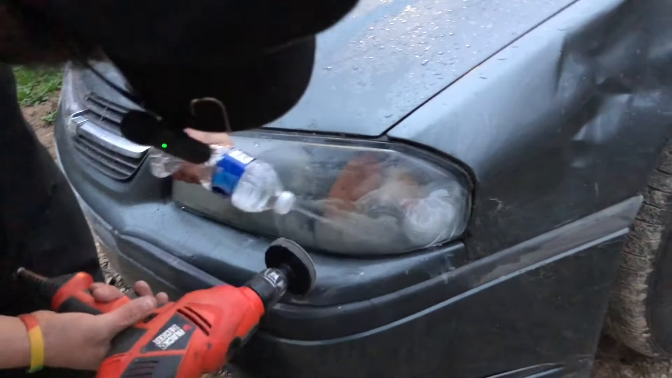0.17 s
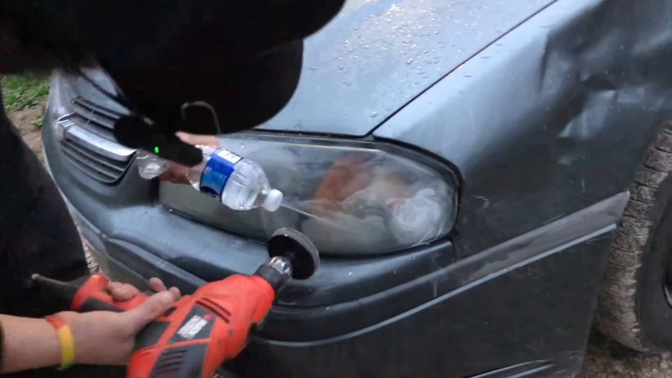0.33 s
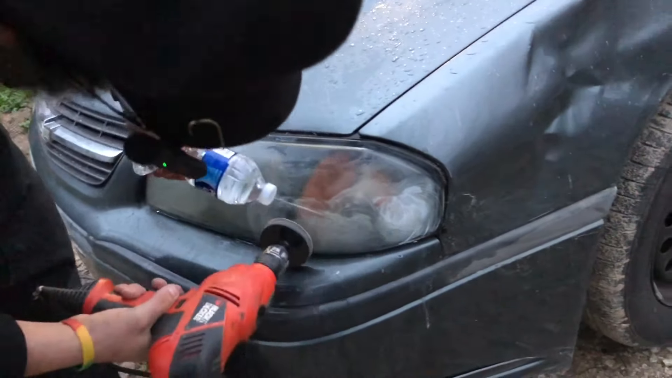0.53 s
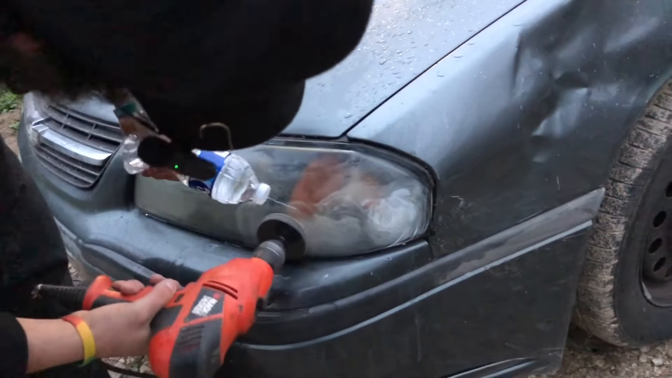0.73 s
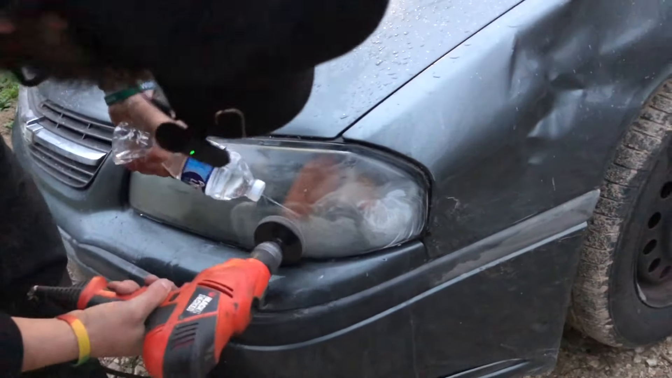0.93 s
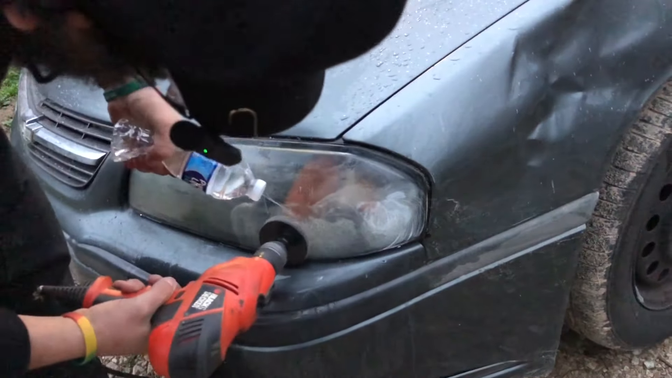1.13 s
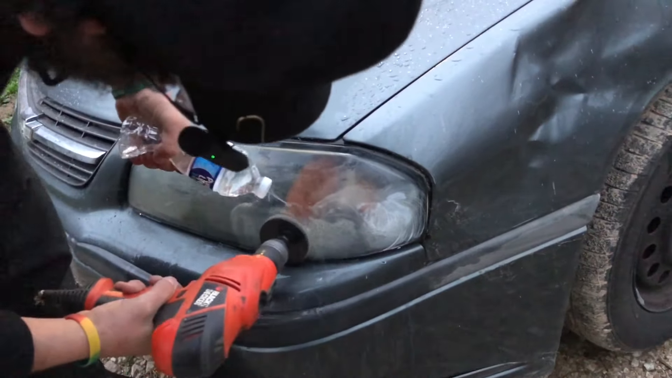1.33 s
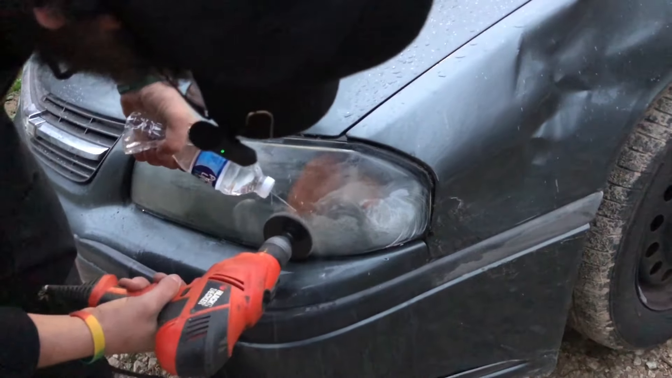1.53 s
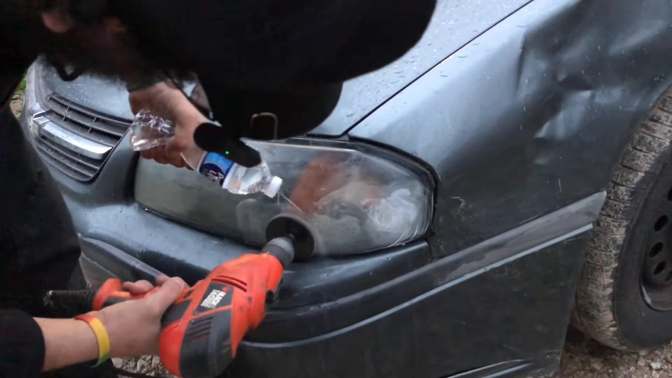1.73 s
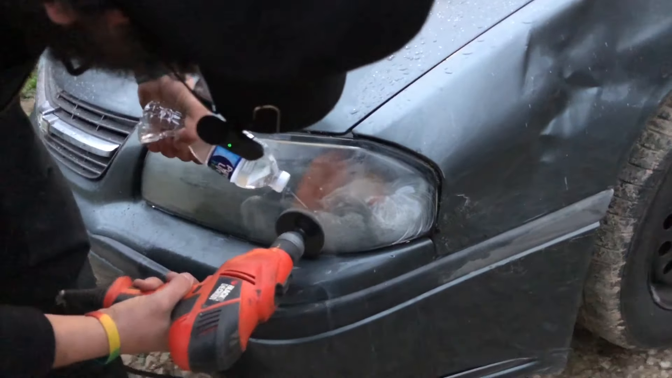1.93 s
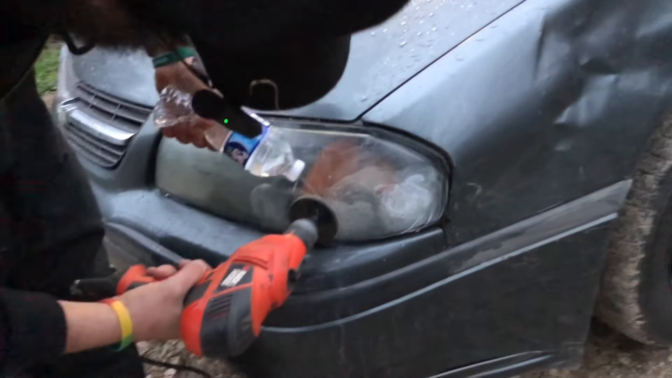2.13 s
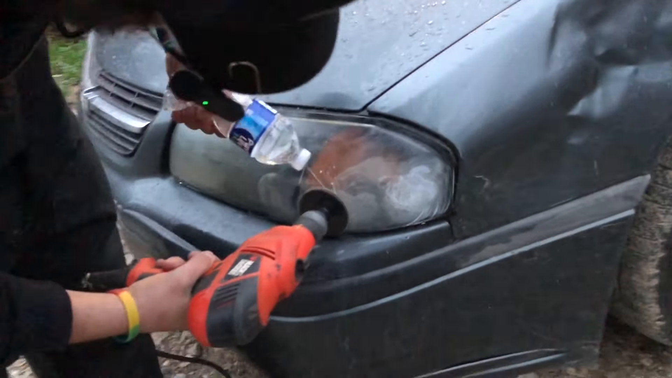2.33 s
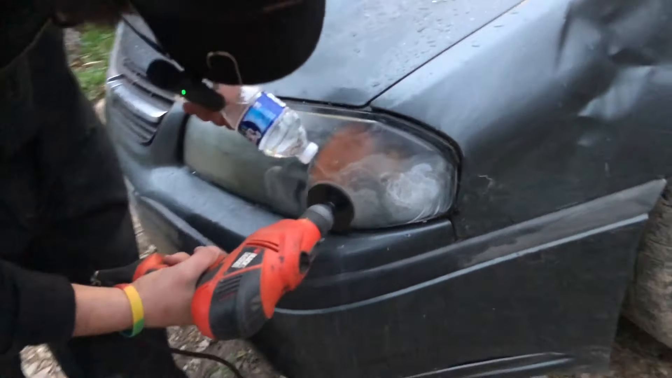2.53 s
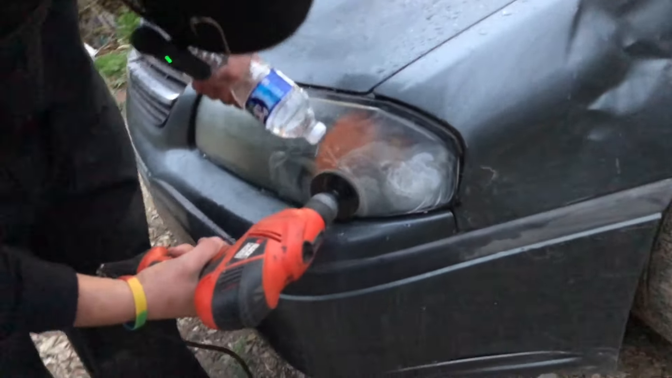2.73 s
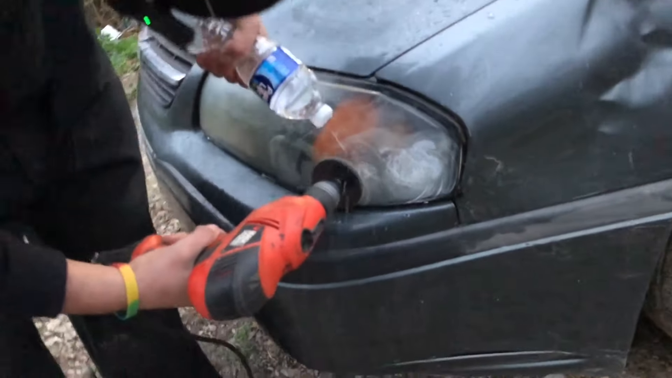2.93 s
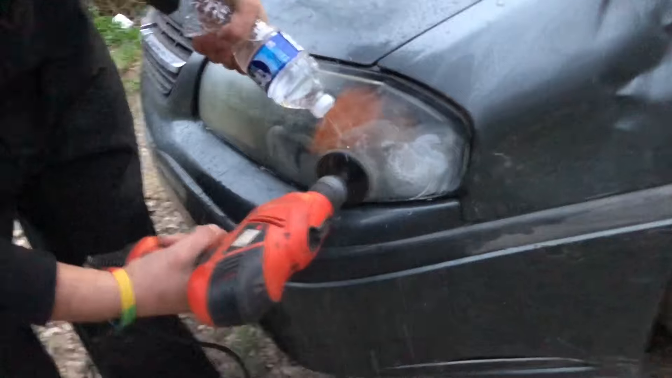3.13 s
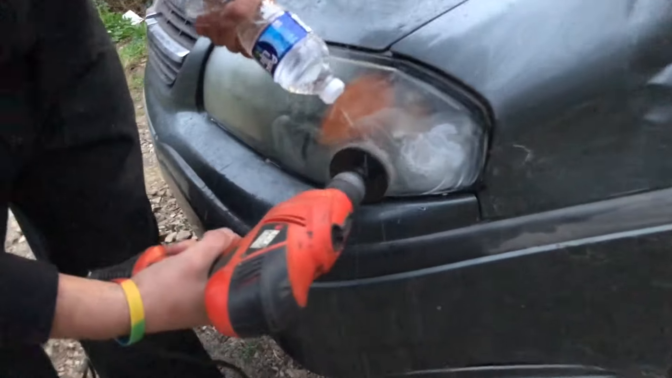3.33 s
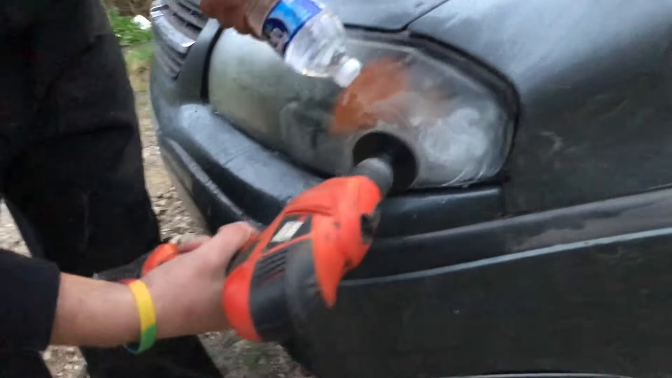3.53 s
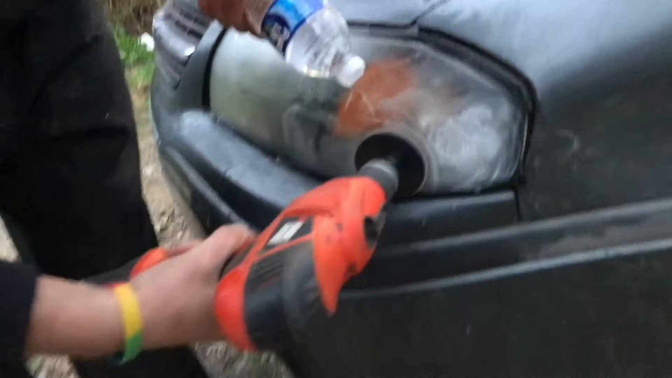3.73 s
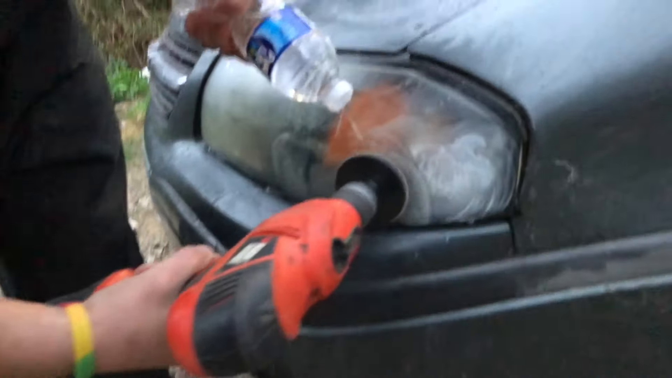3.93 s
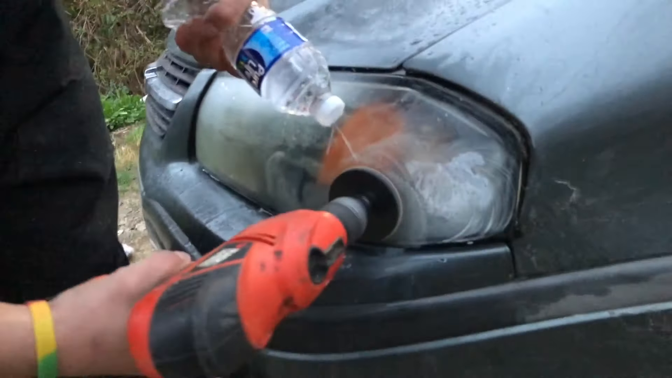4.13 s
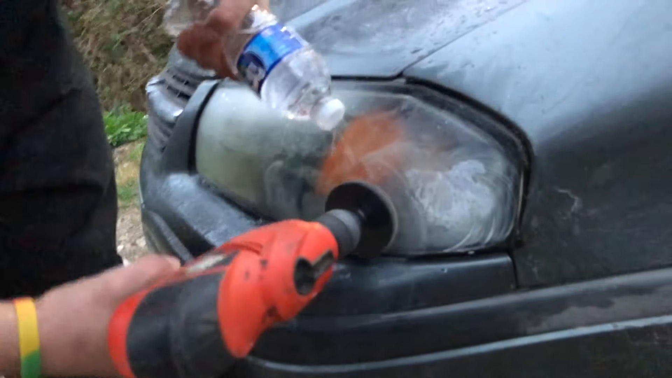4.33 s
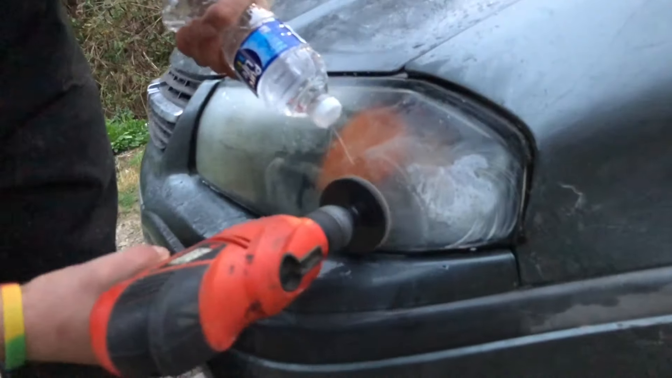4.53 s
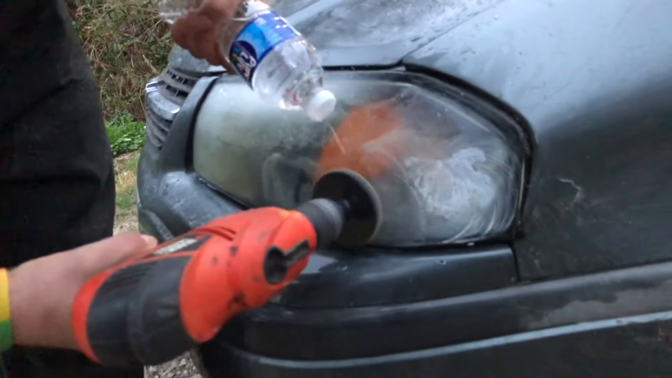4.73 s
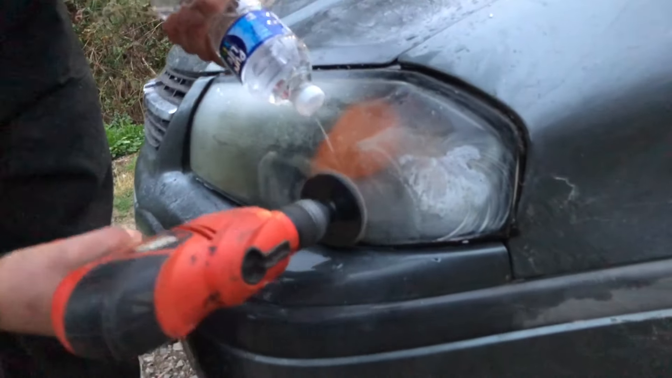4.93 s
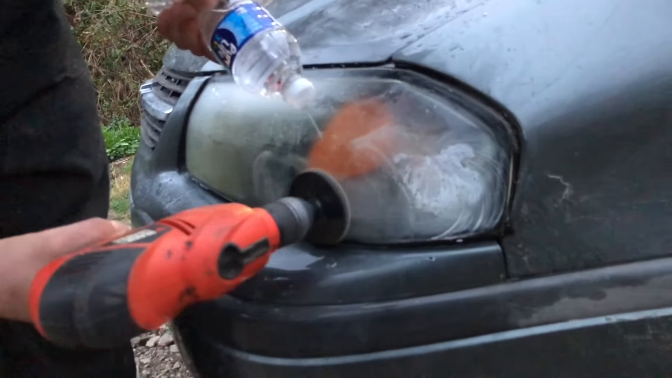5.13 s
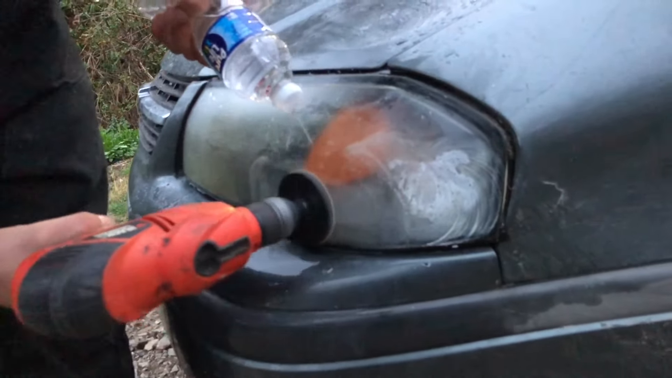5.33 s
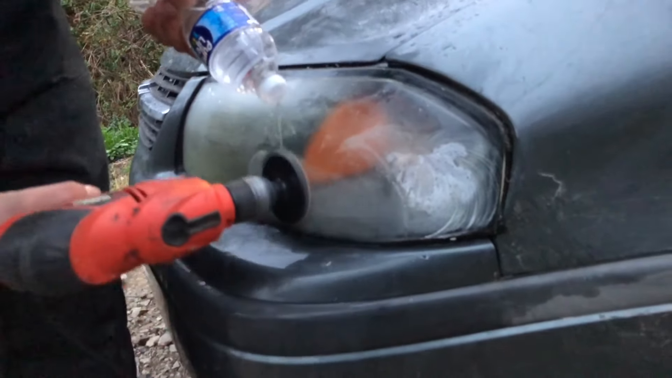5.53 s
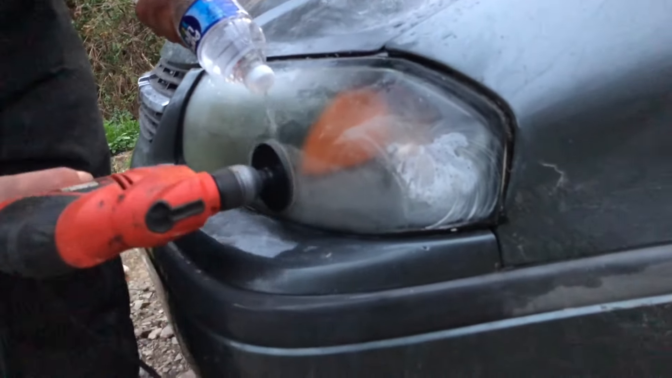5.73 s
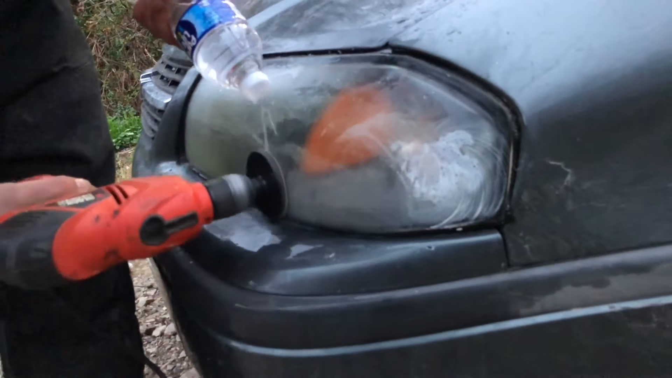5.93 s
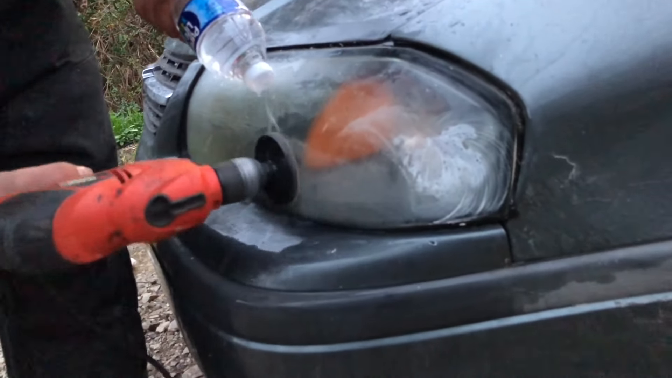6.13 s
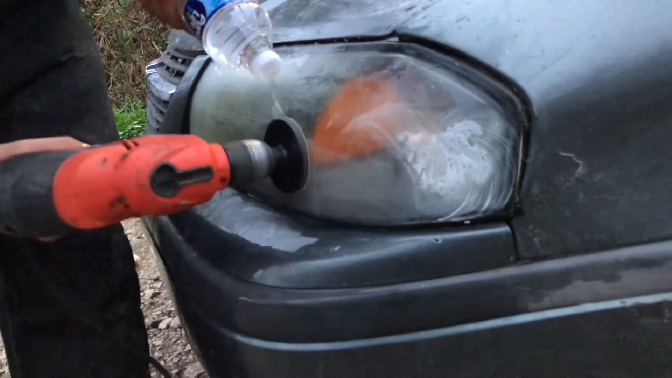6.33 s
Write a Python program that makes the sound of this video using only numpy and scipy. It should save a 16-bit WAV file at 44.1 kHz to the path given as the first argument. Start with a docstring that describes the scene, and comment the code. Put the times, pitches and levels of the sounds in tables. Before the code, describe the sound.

Close, dry outdoor sound of an electric drill sanding a plastic car lamp. It begins with a tiny rasp and near silence, then the motor catches in buzzing pulses and climbs quickly to full speed, with dull handling thumps beneath. Harsh gear rasp and resonant plastic rubbing fill the middle, growing quieter and less airy as the microphone turns aside. After a momentary gap, the rubbing is lighter and hissier.

```python
"""First a brief dry rasp dies away over a faint outdoor hush, then dull low thumps: noise and 125 Hz tones.
A mains drill stutters at half trigger and whines up to full speed: shaped noise and tones follow its motor.
Its wet sanding disc grinds on a plastic headlight, close by: ringing noise gives the lens and its squeals.
The microphone turns away from the work and the grinding grows quieter. Near the end it dips briefly and
comes back thinner and brighter: a lighter hiss with its own tones."""
import sys
import numpy as np
from scipy import signal
from scipy.fft import rfft, irfft, next_fast_len
from scipy.io import wavfile
from scipy.ndimage import uniform_filter1d, map_coordinates

SR = 44100
rng = np.random.default_rng(int(sys.argv[2]) if len(sys.argv) > 2 else 0)


def to_wav(s):
    """Save 16-bit WAV."""
    ch = np.atleast_2d(s).T  # columns
    pcm = np.round(np.clip(ch, -1, 1) * 32767)  # PCM
    wavfile.write(sys.argv[1], SR, pcm.astype(np.int16))


N = 280917
T = np.arange(N) / SR  # time of every sample, in seconds
TOP_HZ = 15700  # top of the sound's band; anything higher is cut


def amp(db):
    """Turn decibels into a gain."""
    return 10 ** (np.asarray(db) / 20)


def unit(x):
    """Scale a sound to an average (rms) level of 1."""
    return x / np.sqrt(np.mean(x ** 2) + 1e-20)


def curve(rows):
    """Join (time in s, value) points by straight lines, one value per sample."""
    return np.interp(T, *np.transpose(rows))


def ramp(start_s, length_s):
    """Rise in a straight line from 0 to 1."""
    return np.clip((T - start_s) / length_s, 0, 1)


def swell(peak_s, length_s):
    """Rise and fall smoothly, reaching 1 at peak_s."""
    return np.exp(-2 * ((T - peak_s) / length_s) ** 2)


def wobble(rate):
    """Draw a smooth random curve through this many random points a second."""
    points = rng.standard_normal(int(N * rate / SR) + 4)
    return map_coordinates(points, [T * rate])


def filtered(x, response):
    """Multiply each frequency of a sound by the gain that response(hz) gives."""
    size = next_fast_len(N + 8192)
    hz = np.fft.rfftfreq(size, 1 / SR)
    return irfft(rfft(x, size) * response(hz), size)[..., :N]


def colour(x, spectrum, peaks=()):
    """Shape a sound by a smooth spectrum with peaks and hollows on it, at rms 1."""
    point_hz, point_db = np.transpose(spectrum)

    def response(hz):
        smooth_db = np.interp(np.log(hz + 1), np.log(point_hz + 1), point_db)
        bumps_db = sum(db * np.exp(-2 * ((hz - centre) / width) ** 2) for centre, width, db in peaks)
        return amp(smooth_db + bumps_db)

    return unit(filtered(x, response))


def band(x, low_hz, high_hz):
    """Keep the part of a sound between two frequencies."""
    return filtered(x, lambda hz: (hz >= low_hz) & (hz < high_hz))


def ring(pitch_hz, width_hz):
    """Friction keeps a resonance sounding: noise in a narrow band, at rms 1."""
    noise = rng.standard_normal(N)
    return unit(filtered(noise, lambda hz: 1 / (1 + (2 * (hz - pitch_hz) / width_hz) ** 4)))


def patchy(x, depth_db):
    """Narrow bands swell and fade at random, like shifting echoes off the bodywork."""
    cells = signal.stft(x, nperseg=1024)[2]
    field = rng.standard_normal(cells.shape)
    for _ in range(2):
        field = uniform_filter1d(field, size=3, axis=0)  # smooth across pitch
        field = uniform_filter1d(field, size=16, axis=1)  # smooth across time
    return signal.istft(cells * amp(depth_db * unit(field)), nperseg=1024)[1][:N]


def grit(turns, throb, grain_db, patchy_db):
    """Grains rub at random: rough noise that swells once per motor turn."""
    noise = patchy(rng.standard_normal(N), patchy_db)
    throbbing = 1 + throb * np.cos(2 * np.pi * turns)
    return noise * throbbing * amp(grain_db * wobble(900))


def lines(turns, orders, flutter_db, drift):
    """Turning parts give tones at multiples of the motor speed, each shaken in level and phase (radians)."""
    total = 0
    for multiple, db in orders:
        flutter = amp(flutter_db * wobble(35))
        phase = 2 * np.pi * multiple * turns + drift * wobble(30)
        total = total + amp(db) * unit(flutter * np.sin(phase))
    return total


# colour of the outdoor hush: pitch_hz, density_db (per Hz, relative)
YARD_COLOUR = [(15, -42), (25, -10), (54, -13), (103, -9), (158, -15.5), (450, -28), (811, -28),
               (1060, -10.5), (1810, -24), (2180, -20.5), (15000, -49)]
# peaks and hollows in that colour: pitch_hz, width_hz, change_db
YARD_BUMPS = [(1080, 150, -0.5), (2230, 200, 4), (2450, 200, -4), (2730, 200, 5), (3400, 700, -4)]


def yard():
    """Outdoor air is a faint, slightly wavering noise with an uneven spectrum."""
    return amp(-66 + wobble(7.2)) * colour(rng.standard_normal(N), YARD_COLOUR, YARD_BUMPS)


# dull low thumps: start_s, level_db (before the quick rise and the decay)
LOW_THUMPS = [(0.255, -63), (0.754, -41), (0.988, -41), (1.188, -38), (1.319, -33), (1.631, -38),
              (2.353, -43)]


def low_thumps():
    """Dull low thumps: 125 Hz tones that start quickly and die away."""
    start_s, level_db = np.transpose(LOW_THUMPS)
    since = np.maximum(T - start_s[:, None], 0)
    decay = amp(-60 * since / 0.146) * (1 - np.exp(-since / 0.0035))
    return amp(level_db) @ (np.sin(2 * np.pi * 125 * since) * decay)


def opening_rasp():
    """A brief dry rasp at the very start: drill-coloured noise dying away fast, with a fainter, slower tail."""
    since = np.maximum(T - .004, 0)
    fast = amp(-60 * since / 0.019)
    slow = amp(-17.5) * amp(-60 * since / 0.093)
    decay = (fast + slow) * (1 - np.exp(-since / 0.0013))
    noise = colour(rng.standard_normal(N), STARTING_COLOUR, HOUSING_BUMPS)
    return amp(-16) * decay * band(noise, 540, 9300)


# colour of the thin hiss: pitch_hz, density_db (per Hz, relative)
BRIGHT_COLOUR = [(88, -56), (150, -35.5), (381, -33), (453, -20.5), (736, -14), (877, -14.5), (1040, -11.5),
                 (1480, -7), (1800, -8), (2760, -4), (3760, -10.5), (4750, -11), (6470, -15), (8330, -12.5),
                 (15500, -17)]
# peaks and hollows in the thin hiss: pitch_hz, width_hz, change_db
BRIGHT_BUMPS = [(735, 100, 2), (890, 92, -3.5), (1483, 115, -7.5), (2700, 240, 2), (3640, 120, 0),
                (6600, 800, -2), (7500, 400, 5.5), (8270, 450, 4.5), (10900, 500, 4), (11900, 500, 1)]
# tones in the thin hiss: multiple of motor speed, level_db (compared with the hiss)
BRIGHT_TONES = [(4, -19), (5.27, -20), (9.05, -22), (10.54, -22), (18, -13.5)]


def light_sanding(turns):
    """A thinner, brighter hiss with shaft tones in it."""
    rubbing = grit(turns, throb=.04, grain_db=-0.5, patchy_db=1.5)
    hiss = colour(rubbing, BRIGHT_COLOUR, BRIGHT_BUMPS)
    tones = lines(turns, BRIGHT_TONES, flutter_db=4.5, drift=0.27)
    return amp(-28.5 + 0.24 * wobble(8.7)) * (hiss + tones)


# the disc's edge catches: peak_s, length_s, pitch_hz, level_db (before the mains pulses)
EDGE_CATCHES = [(0.892, 0.09, 2160, -24), (3.71, .43, 1608, -29)]


def squeals():
    """The plastic rings higher for a moment where the edge of the disc catches."""
    total = 0
    for peak_s, length_s, pitch_hz, level_db in EDGE_CATCHES:
        total = total + amp(level_db) * swell(peak_s, length_s) * ring(pitch_hz, width_hz=0.084 * pitch_hz)
    return total


# the disc is leant on the lens: start_s, end_s, level_db (4 dB above mid-press, before the turning away)
LENS_PRESSES = [(1.276, 2.918, -18), (3.92, 4.867, -9)]
PRESS_RISE_S, PRESS_FALL_S, PRESS_GROWS_DB_PER_S = 0.27, 0.15, 3.5  # the hand leans in ever harder, then lets up
TOUCH_S, TOUCH_DB = 1.07, -21  # light contact that begins first and goes on, before the turning away
ROCK_HZ, ROCK_DB = 5.15, 2.5  # the disc rocks under pressure


def lens():
    """The rubbing disc rings the main mode of the plastic: faintly at a touch, rocking when pressed on."""
    force = amp(TOUCH_DB) * ramp(TOUCH_S, PRESS_RISE_S)
    for start_s, end_s, level_db in LENS_PRESSES:
        rise = ramp(start_s - PRESS_RISE_S / 2, PRESS_RISE_S)
        fall = 1 - ramp(end_s - PRESS_FALL_S / 2, PRESS_FALL_S)
        lean_db = PRESS_GROWS_DB_PER_S * (T - (start_s + end_s) / 2)
        rock_db = -ROCK_DB * np.cos(2 * np.pi * ROCK_HZ * (T - start_s))
        force = force + rise * fall * amp(level_db - 4 + lean_db + rock_db)
    return force * amp(curve(MIC_TURNING)) * ring(1329, 270)


# the housing buzzes during the run-up: peak_s, length_s, pitch_hz, level_db (before the mains pulses)
HOUSING_BUZZES = [(0.582, 0.057, 510, -51.5), (1.18, .11, 563, -26)]


def housing_buzz():
    """A low resonance of the housing buzzes around the first kicks and again at the full squeeze."""
    total = 0
    for peak_s, length_s, pitch_hz, level_db in HOUSING_BUZZES:
        total = total + amp(level_db) * swell(peak_s, length_s) * ring(pitch_hz, width_hz=110)
    return total


# the motor chases a new speed at half and at full trigger: start_s, target turns per second, lag_s
TRIGGER_SQUEEZES = [(.585, 410, .51), (1.18, 469, .215)]
# the most that the load on the disc allows: time_s, turns per second
LOAD_LIMIT = [(2.6, 465), (3.15, 470), (3.7, 466), (4.25, 471.3), (4.8, 467.5), (5.44, 465), (5.55, 462.5),
              (5.85, 462.3), (6.05, 459)]


def motor_speed():
    """Turns per second: each squeeze sends the motor towards a higher speed, until the load holds it."""
    speed = np.zeros(N)
    for start_s, target, lag_s in TRIGGER_SQUEEZES:
        at = round(start_s * SR)
        speed[at:] = target + (speed[at] - target) * np.exp(-(T[at:] - start_s) / lag_s)
    return np.minimum(speed, curve(LOAD_LIMIT))


# the trigger takes hold in notches: start_s, level_db (before the surge)
TRIGGER_NOTCHES = [(.524, -39), (.557, -19), (0.606, -2), (0.623, 0)]
SURGE_DB, SURGE_S = 4, 0.031  # surge on the last notch, and how fast it dies


def trigger():
    """The gain steps up with each notch of the first squeeze; the last brings a surge of current."""
    start_s, level_db = np.transpose(TRIGGER_NOTCHES)
    last_s = start_s[-1]
    surge_db = SURGE_DB * (T > last_s) * np.exp(-np.abs(T - last_s) / SURGE_S)
    steps = np.append(0, amp(level_db))  # silent before the first notch
    return steps[np.searchsorted(start_s, T)] * amp(surge_db)


MAINS_HZ = 60
CHOP_POWER = 1.45  # how fast the pulses merge as the motor gathers speed


def mains_pulses(slowness):
    """Below full speed the motor gets one short kick per mains cycle."""
    since = (T - .6072) % (1 / MAINS_HZ)
    kick = unit((1 - np.exp(-since / 0.00079)) * np.exp(-(since / 0.0088) ** 2))
    share = np.clip(slowness ** CHOP_POWER, 0, .96)
    return np.sqrt(1 - share + share * kick ** 2)


WHINE_DB, WHINE_SLOW_DB = -31.5, -8  # base level reckoned at full speed; change towards standstill
WHINE_FROM_SPEED, WHINE_FADE_DB = 143, -34  # turns per second below which it fades; extra change at standstill


def commutator(turns, speed, slowness):
    """A thin whistle, forty waves a turn, grows and climbs until it stops at the top of the sound's band."""
    fade_db = WHINE_FADE_DB * np.maximum(1 - speed / WHINE_FROM_SPEED, 0)
    level_db = WHINE_DB + WHINE_SLOW_DB * slowness + fade_db
    in_band = 40 * speed < TOP_HZ
    shudder = 0.0032 * wobble(400)  # turns by which the rotor runs ahead or behind
    whistle = lines(turns + shudder, [(40, 0)], flutter_db=3, drift=.6)
    return in_band * amp(level_db + 2.6 * wobble(120.3)) * whistle


# the microphone turns away from the work and the grinding grows quieter: time_s, level_db
MIC_TURNING = [(2.52, -2), (2.75, -3.5), (2.95, -8.5), (3.42, -15.5), (4.1, -17), (5.1, -19)]
# when each view is fully heard, time_s: starting, close, close, turned, turned, away
VIEW_TIMES = [.95, 1.4, 2.42, 2.92, 3.2, 3.9]
# colour of the drill noise from each view: pitch_hz, density_db (per Hz, relative)
STARTING_COLOUR = [(59, -38), (100, -26), (293, -22), (487, -5.5), (774, -10), (1090, 0.5), (2580, -0.5),
                   (3180, -4.5), (4100, 1.5), (4660, -5), (8580, -18.5), (15500, -35)]
CLOSE_COLOUR = [(35, -70), (60, -47), (385, -11), (453, -9), (829, -1), (1350, -2), (1630, -9),
                (2530, -9.5), (3190, -12.5), (4220, -5), (9300, -23), (13800, -21), (15500, -35)]
TURNED_COLOUR = [(59, -72), (100, -47), (370, -18.5), (467, -12.5), (825, -12), (917, -5.5), (1090, -9.5),
                 (1340, 3.5), (1840, -8.5), (2520, -5), (2810, -12.5), (4190, 6), (5400, -3.5),
                 (15500, -27.5)]
AWAY_COLOUR = [(59, -73), (100, -50.5), (355, -16.5), (487, -22), (627, -10.5), (1040, -12), (1400, 0),
               (1840, -8.5), (3250, -12), (4190, -6), (4750, -9.5), (6810, -14), (9150, -23),
               (12000, -17.5), (15500, -30.5)]  # turned further away
# peaks and hollows of the drill's housing: pitch_hz, width_hz, change_db
HOUSING_BUMPS = [(470, 63, 1), (623, 46, 1.5), (797, 167, -4), (1057, 36, 2), (1306, 177, -4.5),
                 (1620, 210, 0.5), (1764, 53, 2.5), (1930, 99, -0.5), (2250, 77, 0.5), (2570, 320, 3),
                 (2750, 150, -1), (3017, 144, 6.5), (3053, 270, -5.5), (3705, 220, 2), (4060, 420, 1.5),
                 (4560, 150, -3.5), (6630, 370, 4), (8420, 420, 4.5), (9330, 510, -3)]
# further peaks and hollows in the sound of the turned view: pitch_hz, width_hz, change_db
TURNED_BUMPS = [(590, 95, -3.5), (750, 120, 6), (2760, 230, -2), (3100, 170, 10), (4000, 170, -3.5),
                (8340, 350, 1), (13200, 2900, 6.5)]
# shaft note, hum, bearing tone, beating pair, gear whine: each a list of multiple of motor speed, level_db
TONE_GROUPS = [
    [(1, 0)],
    [(2, 0), (3, -3)],
    [(5.27, 0)],
    [(7.905, 0), (8, -.5)],
    [(9, 0)],
]
# how each group carries, before strains and slowing: close_db, turned_db, away_db (compared with the rasp)
TONE_CARRY = [(-18, -26.5, -28.5), (-11, -18, -17.5), (-13, -16.5, -21), (-12.7, -14, -17.5),
              (-8, -11, -12)]
# whines swell as the load shifts: peak_s, length_s, bearing_tone_db, gear_whine_db
LOAD_STRAINS = [(2.48, 0.17, -5.5, 5.5), (2.926, 0.35, 7, 2.5), (3.33, 0.31, 0.5, 8.5),
                (3.596, 0.21, 8.5, 4), (3.795, 0.066, -5, 9), (4.5, 0.13, -3, 7)]
RASP_DB, RASP_SLOW_DB = -10, -17.5  # gears and brushes at full speed, before the turning away; change at standstill
FAN_DB, FAN_SLOW_DB = -16, -21  # cooling air, before the vent loss; change at standstill
TONES_SLOW_DB = -55  # the tones sink into the rasp towards standstill
VENT_FROM_S, VENT_TO_S, VENT_LOSS_DB = 2.315, 3.16, -19  # the microphone leaves the draught of the air vents


def drill(turns, slowness):
    """Fan rush below and gear rasp above, coloured by the housing, grow with speed; shaft tones ride on top."""
    rasp_db = RASP_DB + RASP_SLOW_DB * slowness + curve(MIC_TURNING)
    vent_db = VENT_LOSS_DB * ramp(VENT_FROM_S, VENT_TO_S - VENT_FROM_S)
    fan_db = FAN_DB + FAN_SLOW_DB * slowness + vent_db
    source = grit(turns, throb=0.041, grain_db=0.5, patchy_db=2.0)
    views = [colour(source, STARTING_COLOUR, HOUSING_BUMPS),
             colour(source, CLOSE_COLOUR, HOUSING_BUMPS),
             colour(source, TURNED_COLOUR, HOUSING_BUMPS + TURNED_BUMPS),
             colour(source, AWAY_COLOUR, HOUSING_BUMPS)]
    # each view fades into the next
    view_shares = np.eye(4)[:, [0, 1, 1, 2, 2, 3]]
    weights = [np.interp(T, np.sort(VIEW_TIMES), shares) for shares in view_shares]
    rasp = sum(weight * unit(band(view, 1250, SR)) for weight, view in zip(weights, views))
    fan = sum(weight * unit(band(view, 0, 1250)) for weight, view in zip(weights, views))

    starting, close, turned, away = weights
    carry = amp(TONE_CARRY) @ np.array([starting + close, turned, away])
    strain_db = 0
    for peak_s, length_s, bearing_db, gear_db in LOAD_STRAINS:
        strain_db = strain_db + np.outer([0, 0, bearing_db, 0, gear_db], swell(peak_s, length_s))
    tones = 0
    for gain, group in zip(carry * amp(strain_db), TONE_GROUPS):
        tones = tones + gain * lines(turns, group, flutter_db=2.0, drift=0.42)
    return amp(rasp_db) * (rasp + amp(TONES_SLOW_DB * slowness) * tones) + amp(fan_db) * fan


FULL_SPEED = 465  # turns per second


def scene():
    """One motor speed drives the drill's layers; both channels carry the same sound."""
    speed = motor_speed()
    turns = np.cumsum(speed) / SR
    slowness = np.clip(1 - speed / FULL_SPEED, 0, 1)  # 1 at standstill, 0 at full speed
    judder = amp(0.41 * wobble(70))  # the disc grabs and slips
    pulses = mains_pulses(slowness)
    running = trigger() * (drill(turns, slowness) + commutator(turns, speed, slowness))
    # squeals are pulsed twice, so they follow the kicks more steeply
    grinding = (running + housing_buzz() + lens() + squeals() * pulses) * pulses * judder
    dip = (T - 5.47) / 0.042  # the grinding fades out and the thin hiss fades in; silence where this is 0
    before = grinding * np.clip(-dip, 0, 1)
    after = light_sanding(turns) * np.clip(dip, 0, 1)
    mono = yard() + low_thumps() + opening_rasp() + before + after
    return np.array([mono, mono])


def record(dry):
    """The loudest peaks flatten at full scale; everything above the top of the band is cut."""
    clipped = dry / (1 + np.abs(dry) ** 10) ** (1 / 10)
    return filtered(clipped, lambda hz: hz < TOP_HZ)


dry = scene()
out = record(dry)
to_wav(out)
```